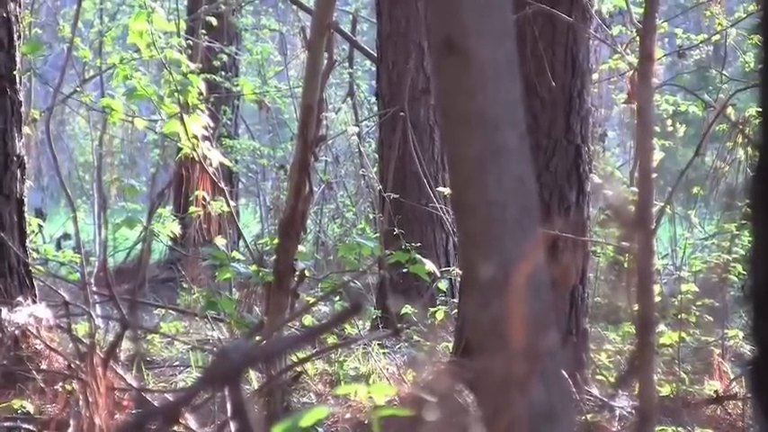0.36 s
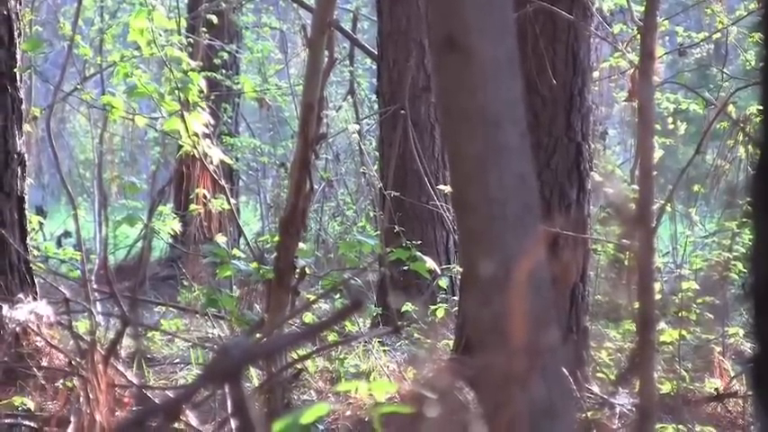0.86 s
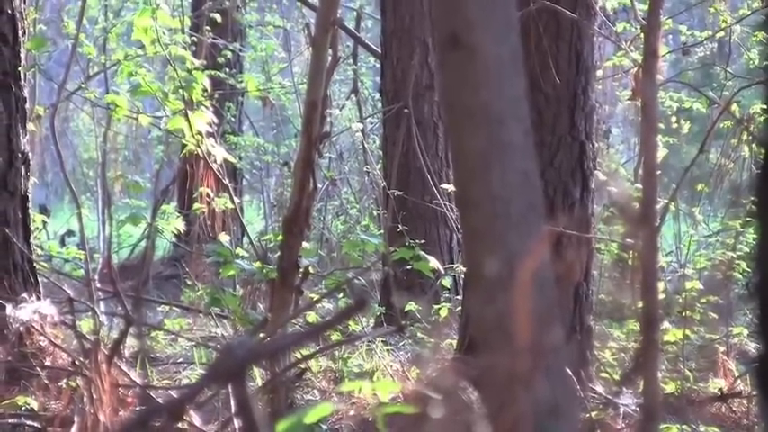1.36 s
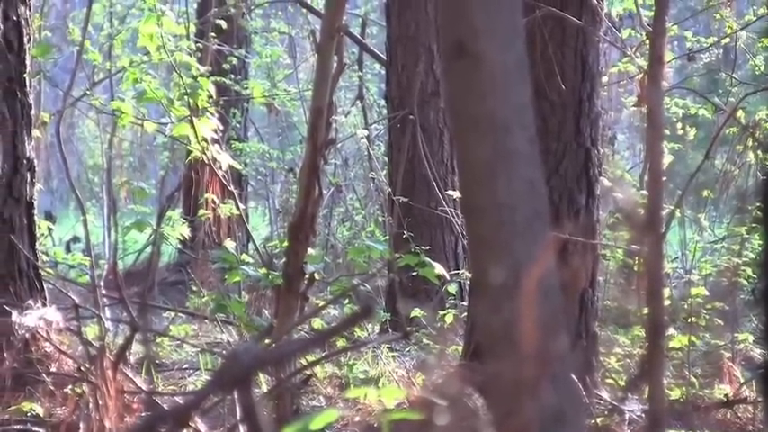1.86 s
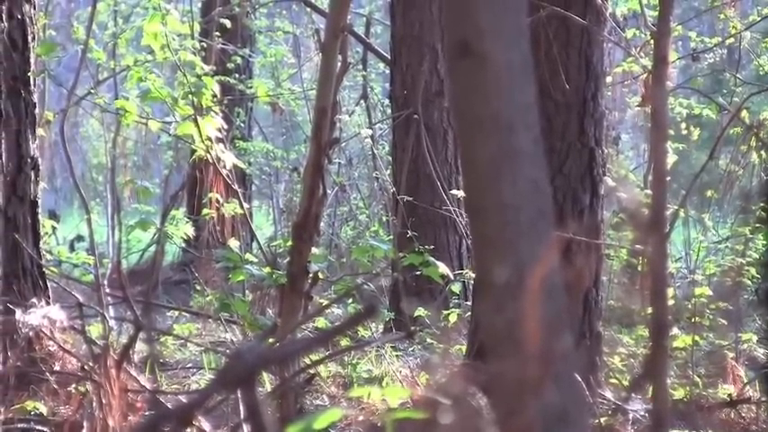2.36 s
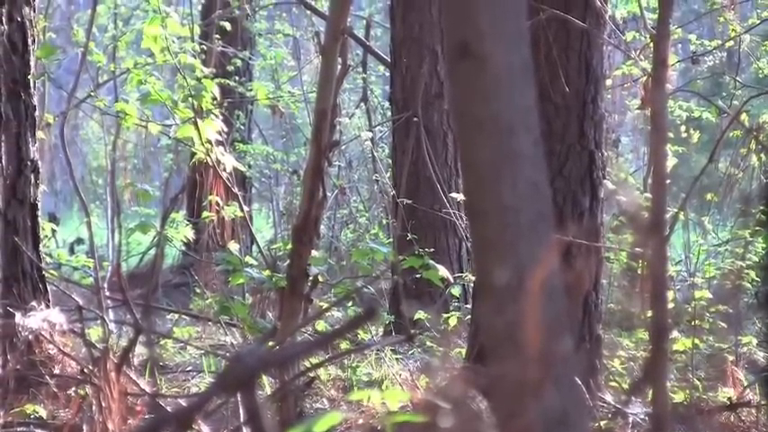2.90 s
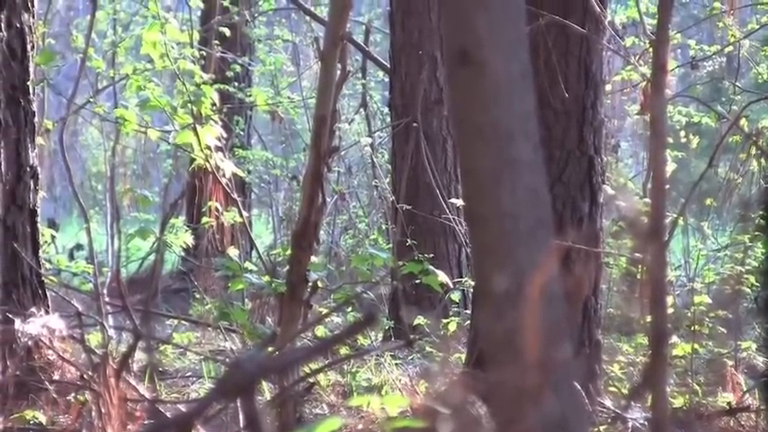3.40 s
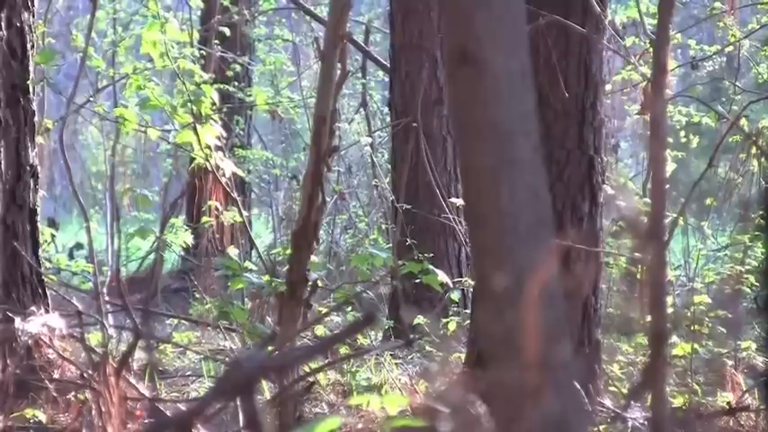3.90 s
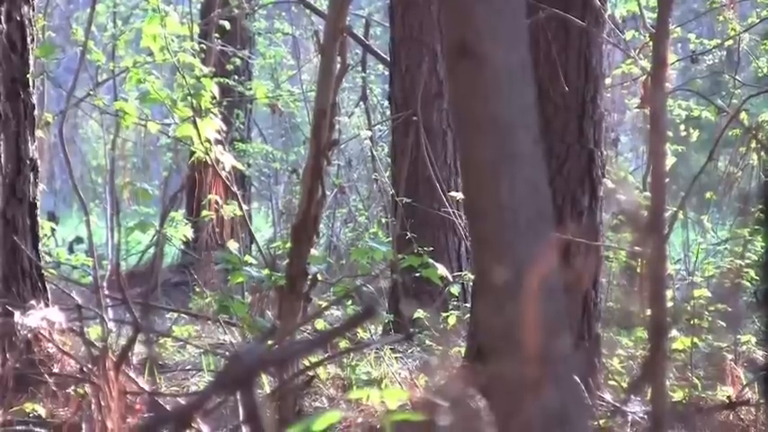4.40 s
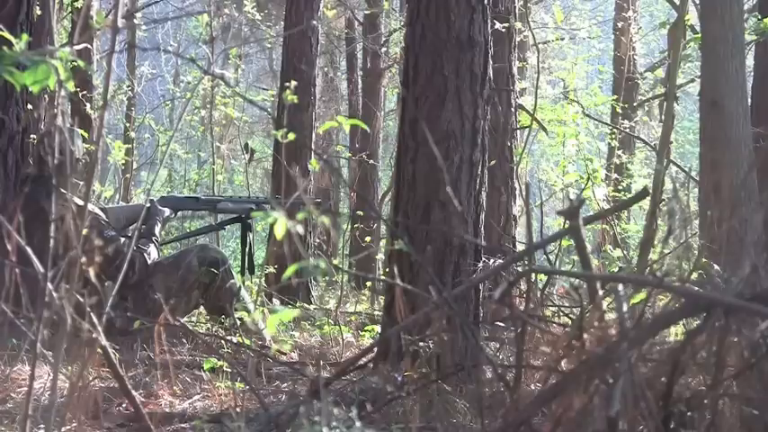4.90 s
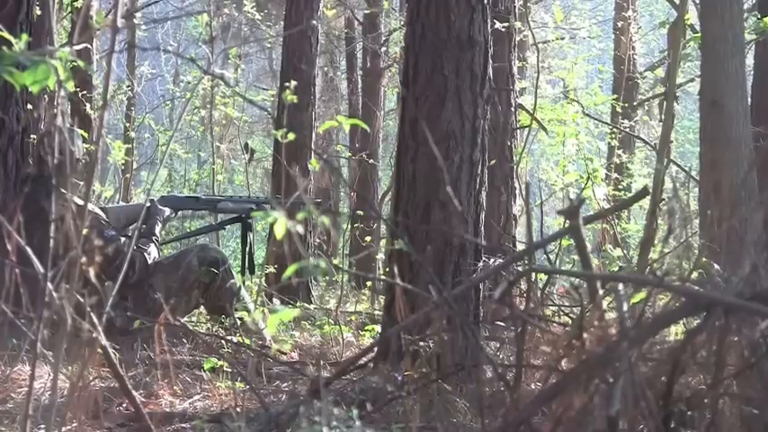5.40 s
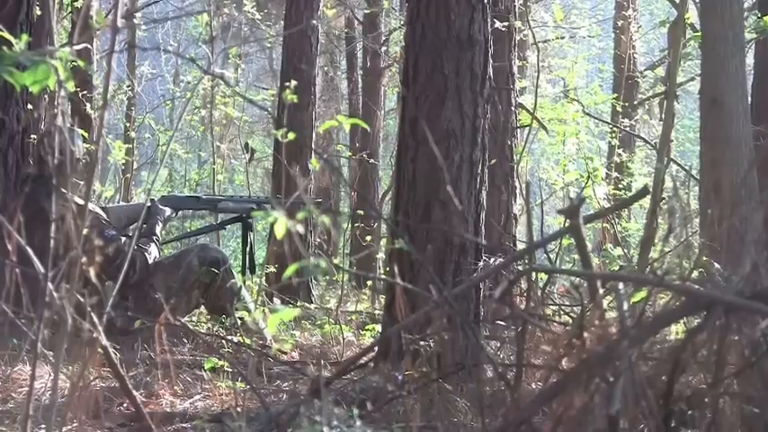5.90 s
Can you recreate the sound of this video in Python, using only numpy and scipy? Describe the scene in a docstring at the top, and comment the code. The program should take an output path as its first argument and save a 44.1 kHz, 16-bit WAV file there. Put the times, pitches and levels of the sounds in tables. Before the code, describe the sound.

Quiet spring woods with a faint low bed of air and hiss, heard in stereo. From about 0.8 seconds a turkey yelps close on the right, nine short notes roughly 0.3 seconds apart until 3.2. The first is barely there, the next clearer; each rises slightly in pitch, and they grow louder, more nasal and raspy, with short scatter off trunks. Behind them a faint songbird on the left repeats a rising whistle between 1 and 2.2 seconds. From 2.8 to 3.5 a distant, low, rattling gobble overlaps the final yelps, blurred by the woods. Tiny high bird slurs flicker until 4. A soft far cluck comes at 4.5. Around 4.8 everything quickly fades out and back in. Until about 6 seconds, a left-side songbird repeats short held whistles that drop at the end, with four faint hoarse caws far away.

```python
"""Nine raspy turkey yelps close by on the right, in spring woods; a far gobble overlaps their end.
A membrane's pulses excite mouth resonances; rough note bursts make the gobble, gliding sines the songbirds.
A far harmonic cluck and cawing resonant noise follow, with decaying noise as scatter from trunks.
Faint air and hiss lie beneath; near the end the sound fades out and soon fades in again."""
import sys
import numpy as np
from scipy import signal
from scipy.fft import rfft, irfft
from scipy.io import wavfile
from scipy.ndimage import uniform_filter1d

SR = 44100
rng = np.random.default_rng(int(sys.argv[2]) if len(sys.argv) > 2 else 0)


def volts_from_decibels(level):
    """Turn decibel levels (scalar or array-like) into linear amplitude factors."""
    exponent = np.asarray(level, float) / 20
    return 10 ** exponent


def unload_audio(sound):
    """Save the sound as a 16-bit wav file, at the path given as the first command line argument."""
    columns = np.transpose(np.atleast_2d(sound))
    # keep every value between -1 and 1, then stretch to whole-number steps
    steps = np.round(np.clip(columns, -1, 1) * 32767)
    wavfile.write(sys.argv[1], SR, steps.astype(np.int16))


N = 265041
JOIN_S = 4.834   # the bottom of the fade out and in


def rms_one(x):
    """Normalization: equal mean power, rms 1."""
    return x / np.sqrt(np.mean(x ** 2) + 1e-20)


def in_time(rows):
    """Linear interpolation of control points; the last output marks where the table runs."""
    s, *columns = np.transpose(rows)
    t = np.arange(N) / SR
    curves = [np.interp(t, s, column) for column in columns]
    return curves + [(t >= s[0]) & (t <= s[-1])]


def at_hz(points, hz):
    """Interpolation of a spectrum on a logarithmic frequency axis."""
    point_hz, value = np.transpose(points)
    return np.interp(np.log(hz + 1), np.log(point_hz), value)


def cut(x, hz, kind, order=4):
    """Butterworth filtering: a maximally flat low- or high-pass."""
    return signal.sosfilt(signal.butter(order, hz, kind, fs=SR, output="sos"), x)


def resonate(x, modes):
    """Modal superposition: parallel two-pole resonances with alternating signs."""
    out = 0
    for k, (hz, width, db) in enumerate(modes):
        r = np.exp(-np.pi * width / SR)   # pole radius sets the bandwidth
        zeros = [(1 - r * r) / 2, 0, (r * r - 1) / 2]
        poles = [1, -2 * r * np.cos(2 * np.pi * hz / SR), r * r]
        out = out + (-1) ** k * volts_from_decibels(db) * signal.lfilter(zeros, poles, x + 1e-18)
    return out


def whistle(rows):
    """Phase is the integral of frequency: a sine of rms 1 at 0 dB that follows (t/s, f/Hz, level/dB)."""
    hz, db, on = in_time(rows)
    return np.sqrt(2) * volts_from_decibels(db) * on * np.sin(2 * np.pi * np.cumsum(hz) / SR)


def yelp_rows(s, lead, hold, hz, end_hz, over_db, tone_db, flick_db):
    """Pitch glide of one yelp: (t/s, f/Hz, fundamental, overtone and hiss level/dB)."""
    # the hold: share of its length, share of the creep in pitch,
    # fundamental level/dB, overtone level/dB, hiss level/dB (all relative)
    hold_shape = [(0, .01, -2.5, -0.5, -2.5), (.2, .01, -.5, 0.3, 1.5), (.55, 0.33, 1.2, -1, 1),
                  (.85, 0.677, -2.5, -2.5, 0), (1, .99, -1.5, -5.5, -5)]
    # the upward flick: t/s after the hold, share of the way to its top pitch,
    # fundamental level/dB, overtone level/dB, hiss level/dB (all relative)
    release_shape = [(.012, .3, -14.5, -13, -9.5), (.024, 0.702, -13.5, -18.5, -14),
                     (.036, .99, -15, -18.5, -12), (.046, .99, -51, -43, -27)]
    flick_hz = 1059
    swoop_s, settle = .04, .04   # parabola: an octave of fall in this time; share of pitch still left to fall
    swell_db_per_octave, thin_db_per_octave = 27, -32.5   # overtones gain, fundamental loses, as pitch creeps
    soft_db = -18.5 + .52 * over_db   # overtones of the lead-in follow only part of the effort
    hiss_db = over_db - 17
    octaves = np.log2(end_hz / hz)
    rows = []
    for u, rise_db in [(1.1, -30), (0.827, .5), (.55, -5.0), (0.2, 0.5)]:   # share of the lead-in left
        lead_hz = hz * (1 + settle + (u * lead / swoop_s) ** 2)
        rows.append((s - u * lead, lead_hz, tone_db - 18.5 * u, soft_db + rise_db,
                     hiss_db + hold_shape[0][4] - 14 * u))
    for u, up, a, b, c in hold_shape:
        hold_hz = hz + up * (end_hz - hz) + settle * hz * (u == 0)
        creep = up * octaves
        rows.append((s + u * hold, hold_hz, tone_db + a + creep * thin_db_per_octave,
                     over_db + b + creep * swell_db_per_octave, hiss_db + c))
    for u, up, a, b, c in release_shape:
        rows.append((s + hold + u, end_hz + up * (flick_hz - end_hz), tone_db + a + up * flick_db,
                     over_db + b + up * flick_db, hiss_db + c))
    return rows


def yelps():
    """Source and filter: a membrane snapping shut once a cycle drives mouth resonances, with air hiss."""
    # hold start t/s, lead-in/s, hold/s, base pitch f/Hz, pitch neared at hold end f/Hz,
    # overtone level/dB, fundamental level/dB, level added by the full flick/dB (all levels relative)
    calls = [(0.79, .02, 0.08, 483.6, 555.5, -41, -48, -24), (1.095, .024, .068, 482, 554, -33.5, -34.5, 9),
             (1.395, 0.04, 0.056, 517, 572.5, -23.5, -33, 7),
             (1.685, 0.024, 0.075, 536.8, 571.8, -19.5, -31.5, 3.5),
             (1.986, 0.032, 0.064, 577.6, 602, -19, -32, -0.5),
             (2.262, .032, 0.071, 545.8, 595.6, -19, -30.5, 0),
             (2.547, .028, .074, 587, 624, -17.5, -30.5, -9.5),
             (2.825, 0.029, 0.079, 594.6, 668, -17.5, -30, -9),
             (3.104, .026, 0.087, 604.3, 666.7, -15, -29, -1)]
    # per yelp: base roughness [0-1], strong-weak alternation of pulses [0-1], mouth opening [0-1]
    rasps = [(.03, .05, .05), (.05, .25, .05), (.18, .25, .2), (.16, .2, .2), (.36, .35, .5),
             (.26, .3, .45), (.45, .3, .75), (.58, .2, .95), (.62, .2, .95)]
    # mouth resonances: f/Hz, width/Hz, closed level/dB, gain when open/dB
    mouth_modes = [(1071, 97, -1.5, 1), (1325, 133, -12.5, 15), (1550, 112, -6.5, 8), (2166, 172, -3, 3)]
    # resonances of the air hiss: f/Hz, width/Hz, relative level/dB
    hiss_modes = [(2920, 820, -2), (4200, 404, 0), (5600, 600, -8), (7600, 430, -2.5), (9320, 840, -6.5),
                  (12500, 2100, -11.5)]
    out = np.zeros(N)
    noise = rng.standard_normal((4, N))
    hiss = rms_one(resonate(cut(noise[0], 1600, "high"), hiss_modes))
    wobble = rms_one(cut(noise[1], 120, "low", order=2))
    stumble = rms_one(cut(noise[3], 260, "low", order=2))
    for call, (rasp, alternate, opening) in zip(calls, rasps):
        pitch_hz, tone_db, over_db, hiss_db, on = in_time(yelp_rows(*call))
        rough = np.clip(rasp + .45 * np.log2(pitch_hz / pitch_hz.min()), 0, 1)   # higher pitch is rougher
        phase = 2 * np.pi * np.cumsum(pitch_hz * (1 + 0.01196 * wobble)) / SR
        snap = phase + 1.134 * rough * stumble   # rough closures come early or late
        pulses = np.exp(5.0 * (np.cos(snap) - 1)) * (1 + alternate * np.cos(snap / 2))
        gusts = cut(.8 * noise[2] * (.4 + pulses), 980, "high", order=6)   # turbulence, gated each cycle
        mouth = [(hz, width, db + opening * gain_db) for hz, width, db, gain_db in mouth_modes]
        over = resonate(cut(pulses, 594, "high", order=6) + rough * gusts, mouth)
        over = cut(over, 2000, "low", order=2)
        # a side cavity swallows a strip between two mouth resonances
        over = signal.lfilter(*signal.iirnotch(1800, 8.0, fs=SR), over)
        over /= np.sqrt(uniform_filter1d(over ** 2, size=700) + 1e-12)   # level it before its own envelope
        # lines between the harmonics
        halves = alternate * (.6 * np.sin(3 * snap / 2) + .2 * np.sin(snap / 2))
        fundamental = np.sin(phase + .5 * rough * stumble) * (1 + .4 * rough * wobble)
        tone = cut(np.sqrt(2) * (fundamental + halves), 256, "high")
        breath = hiss * (.9 + .5 * pulses)
        voice = volts_from_decibels(over_db + 3.0 * rough * wobble) * over + volts_from_decibels(tone_db) * tone
        out += on * (voice + volts_from_decibels(hiss_db) * breath)
    return out


def both_microphones(x):
    """Interaural delay and shadow: the left side is late and shaded."""
    # level at the left relative to the right: f/Hz, level/dB
    shade = [(600, 0.5), (1000, -7), (1500, -6), (2500, -2.5), (4400, -11), (8000, -32), (15000, -20.5)]
    lag_s = .00022
    hz = np.fft.rfftfreq(N, 1 / SR)
    left = irfft(rfft(x) * volts_from_decibels(at_hz(shade, hz)) * np.exp(-2j * np.pi * hz * lag_s), N)
    return np.array([left, x])


def woods(x, t60, top_hz, rise_s):
    """Diffuse scatter from trunks: convolution with decaying noise of energy 1, other on each side."""
    t = np.arange(SR) / SR
    tail = cut(rng.standard_normal((2, SR)), top_hz, "low", order=2)
    tail = tail * volts_from_decibels(-60 * t / t60) * np.minimum(t / rise_s, 1)
    return signal.fftconvolve(np.atleast_2d(x), rms_one(tail) / np.sqrt(SR), axes=1)[:, :N]


def gobble():
    """Amplitude modulation by noise roughens short Gaussian notes that fall in pitch."""
    # notes: t/s (14 ms ahead of the envelope's peak), relative peak level/dB, pitch at the peak f/Hz
    notes = [(2.764, -66, 355), (2.822, -43.5, 336), (2.859, -58, 440), (3.002, -46.5, 305),
             (3.063, -48, 343), (3.122, -38.5, 347.4), (3.215, -51, 373), (3.267, -49.5, 380),
             (3.352, -47, 348), (3.428, -51, 345), (3.497, -58, 388)]
    out, t = np.zeros(N), np.arange(N) / SR
    rough = 1 + .5 * rms_one(cut(rng.standard_normal(N), 90, "low", order=2))
    for s, db, hz in notes:
        u = t - s - .014
        out += volts_from_decibels(db) * np.exp(-(u / 0.017) ** 2) * np.sin(2 * np.pi * hz * u * (1 - 3.1 * u))
    return out * rough


def left_bird(x, wet_db, t60):
    """Level panning to the left, a moment late there; moving air makes the direct sound flutter."""
    flutter = rms_one(cut(rng.standard_normal(N), 70, "low", order=2))
    direct = x * volts_from_decibels(3.2 * flutter)
    pair = np.array([np.roll(direct, 9) * volts_from_decibels(5.5), direct * volts_from_decibels(-7.5)])
    return pair + volts_from_decibels(wet_db + np.array([[1.5], [-1.5]])) * woods(x, t60, 5700, 0.026)


def rising_song():
    """Frequency modulation: one rising whistle repeated at several levels."""
    # shape of the phrase: t/s after its start, f/Hz, relative level/dB
    phrase = [(0, 2463, -1), (.025, 2750, 0.5), (.05, 3025, 5.5), (.1, 3060, 1.5), (.125, 3050, -2.5),
              (.14, 3020, -45)]
    # phrases: start t/s, relative level/dB
    starts = [(1.04, -54.5), (1.305, -53), (1.575, -53), (1.84, -54.5), (2.07, -61.5), (4.695, -58)]
    return sum(whistle(np.array(phrase) + [s, 0, db]) for s, db in starts)


def held_song():
    """Amplitude and frequency modulation: a note swells and holds, drops in pitch, then flicks."""
    # notes: end of hold t/s, hold length/s, pitch as the hold ends f/Hz, relative level/dB
    held_notes = [(4.939, 0.15, 2543, -53.5), (5.141, 0.067, 2612, -53), (5.344, 0.1, 2580, -52.5),
                  (5.543, 0.096, 2569, -53.5), (5.745, 0.19, 2608, -54.5), (5.941, 0.089, 2562, -52.5)]
    # drop and flick: t/s after the hold, pitch ratio, relative level/dB
    drop_shape = [(0, 1, 3.5), (.008, .95, 4), (0.017, .87, -9), (.021, 0.96, -37), (.025, 1.07, -31),
                  (.03, 1.06, -6), (.045, .95, -2), (.056, 0.68, -30)]
    out = 0
    for s, hold, hz, db in held_notes:
        shape = [(-hold, .995, -22), (.015 - hold, .995, -7)] + drop_shape
        out = out + whistle([(s + u, hz * ratio, db + rel) for u, ratio, rel in shape])
    return out


def slurs():
    """Linear glides, each panned by level; moving air makes the level flutter."""
    # faint slurs: start t/s, length/s, from f/Hz, to f/Hz, relative level/dB, left minus right level/dB
    glides = [(0.513, 0.026, 6620, 6610, -73, 5), (.68, 0.11, 6100, 6180, -81, 1),
              (0.909, 0.044, 2344, 3316, -63.5, -2), (0.969, .08, 3250, 2155, -65.5, -3),
              (0.959, 0.035, 6320, 6200, -72, 6), (1.08, .07, 6240, 6370, -69.5, 3),
              (1.282, 0.047, 6300, 6240, -76, -5), (1.74, 0.045, 3920, 3900, -66, 9),
              (1.853, 0.056, 3950, 3670, -66, 6), (2.068, 0.09, 4480, 4880, -73, 4),
              (2.504, 0.055, 3000, 3570, -55, 1), (2.935, 0.045, 4200, 4690, -64.5, -1),
              (3.259, 0.056, 5640, 4920, -68.5, -1), (3.362, 0.054, 4450, 4590, -65.5, -1),
              (3.416, .05, 4620, 2960, -64, -2), (3.549, 0.064, 3000, 3480, -67.5, -3),
              (3.602, 0.056, 3540, 4620, -63.5, -4), (3.737, 0.09, 3040, 3360, -67.5, 1),
              (3.796, 0.056, 3490, 4670, -63, -3), (3.831, 0.086, 3430, 3730, -66.5, 0),
              (3.907, 0.042, 3650, 2620, -61.5, -2), (3.938, 0.038, 5600, 4940, -67, 0)]
    out = np.zeros((2, N))
    for s, length, a, b, db, pan in glides:
        rows = [(s + u * length, a + u * (b - a), db + fade)
                for u, fade in [(0, -3), (.2, 2), (.8, 1), (1, -1)]]
        out += whistle(rows) * volts_from_decibels(np.array([[pan / 2], [-pan / 2]]))
    flutter = rms_one(cut(rng.standard_normal(N), 90, "low", order=2))
    return out * volts_from_decibels(2.5 * flutter)


def cluck():
    """Harmonic superposition: a short stack of partials with a sharp start and falling pitch."""
    # harmonics from the first: relative level/dB
    harmonics = [-53, -47.5, -61, -58, -58.5]
    s, length, pitch_hz = 4.466, 0.034, 592   # start/s, length/s, starting pitch
    out = 0
    for k, db in enumerate(harmonics, 1):
        hz = k * pitch_hz
        out = out + whistle([(s, hz, db - 21), (s + 0.0035, hz, db), (s + length, hz * 0.9, db - 24),
                             (s + length + 0.0092, hz * 0.95, db - 28)])
    return out


def caws():
    """Resonance filtering: noise pulsing at 45 Hz passes one throat resonance twice."""
    # caws: start t/s, length/s, throat f/Hz, relative level/dB
    calls = [(5.091, 0.088, 1400, -57.5), (5.3, 0.082, 1550, -61), (5.586, 0.144, 1375, -59.5),
             (5.958, 0.068, 1430, -59)]
    out, t = np.zeros(N), np.arange(N) / SR
    noise = rng.standard_normal(N) * (1 + 0.5 * np.cos(2 * np.pi * 45 * t))
    for s, length, hz, db in calls:
        swell = np.clip(np.minimum((t - s) / 0.0018, (s + length - t) / 0.0076), 0, 1)
        throat = [(hz, 170, 0)]
        out += volts_from_decibels(db) * swell * rms_one(resonate(resonate(noise, throat), throat))
    return out


def air():
    """Partial coherence: steady stereo noise, most alike on both sides in the bass."""
    # noise spectrum: f/Hz, relative spectral level/dB
    spectrum = [(20, -16.5), (48, -7.5), (62, -3), (125, -1), (200, -2.5), (350, -4), (500, -7),
                (1000, -12.5), (3000, -17), (8000, -23), (14500, -27), (16000, -40)]
    # left-right likeness: f/Hz, correlation [0-1]
    likeness = [(60, 0.49), (240, 0.3), (950, 0.19), (3770, 0.075), (15000, 0.21)]
    hz = np.fft.rfftfreq(N, 1 / SR)
    mid, side = rfft(rng.standard_normal((2, N))) * volts_from_decibels(at_hz(spectrum, hz))
    alike = np.clip(at_hz(likeness, hz), -1, 1)
    pair = irfft(np.sqrt(1 + alike) * mid + np.sqrt(1 - alike) * side * [[1], [-1]], N)
    pair = pair / np.sqrt(np.mean(pair.mean(0) ** 2))
    return volts_from_decibels(-52) * pair * volts_from_decibels(np.array([[-.4], [.4]]))


def scene():
    """Superposition: near yelps, far birds with more scatter, and the air."""
    near = yelps()
    out = both_microphones(near)
    out += volts_from_decibels(-11.0) * woods(cut(near, 1100, "high", order=2), 0.1, 10000, 0.0027)   # ground, nearest trunks
    out += volts_from_decibels(-30) * woods(cut(near, 370, "high", order=2), 0.75, 5200, 0.02)   # deeper woods
    tom = gobble()
    out += np.array([np.roll(tom, 7) * volts_from_decibels(-1.5), tom])   # a little late and soft on the left
    out += volts_from_decibels(-9.5) * woods(tom, 0.8, 2000, 0.076)
    before = np.arange(N) < JOIN_S * SR   # these birds and their scatter stop at the join
    out += before * left_bird(rising_song(), wet_db=-.5, t60=0.95)
    out += left_bird(held_song(), wet_db=-2.5, t60=0.72)
    faint = slurs()
    out += faint + volts_from_decibels(7.5) * woods(faint, .8, 9000, .006)
    short = cluck()
    out += before * (short + volts_from_decibels(0.0) * woods(short, 0.73, 4250, 0.012))
    far = caws()
    out += far + volts_from_decibels(-1) * woods(far, 1.0, 4200, 0.0076)
    return out + air()


def band_limit(x):
    """A steep low-pass at the top of the band."""
    return signal.sosfilt(signal.butter(12, 15950, fs=SR, output="sos"), x)


def record(dry):
    """Linear gain: a quick fade out and in at the join, over a faint floor."""
    fade_out_s, fade_in_s, floor_db, recorder_db = .075, .09, -36.5, -6
    t = np.arange(N) / SR - JOIN_S
    fade = np.clip(np.maximum(-t / fade_out_s, t / fade_in_s), 0, 1) + volts_from_decibels(floor_db)
    mix = dry * fade * volts_from_decibels(recorder_db)
    return band_limit(mix)


dry = scene()
out = record(dry)
unload_audio(out)
```